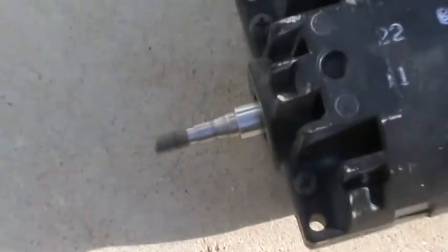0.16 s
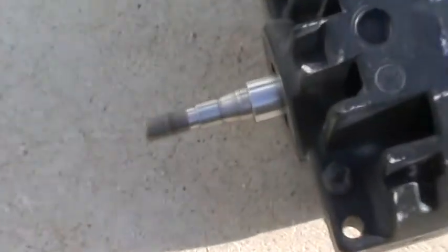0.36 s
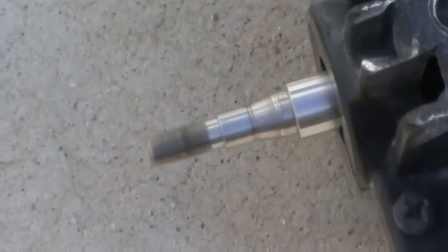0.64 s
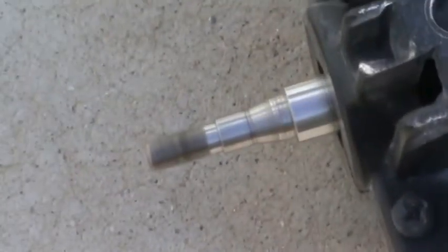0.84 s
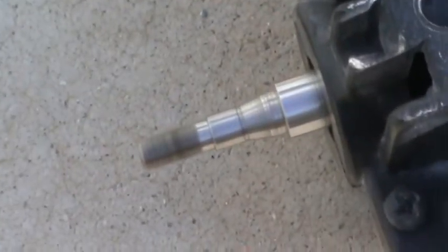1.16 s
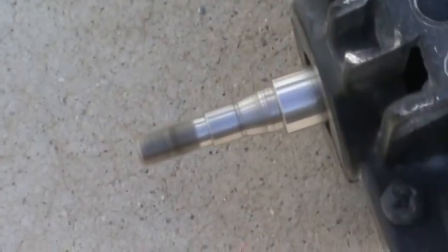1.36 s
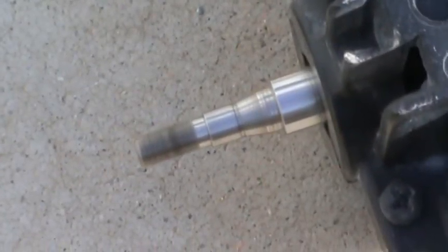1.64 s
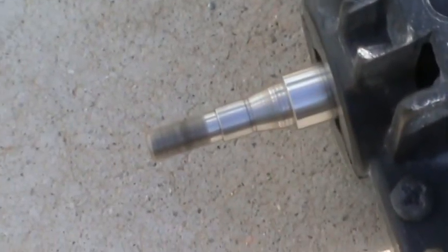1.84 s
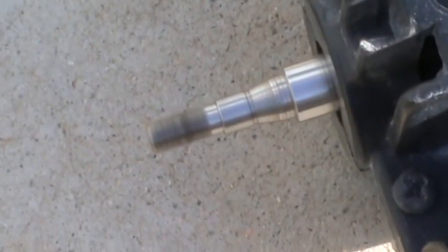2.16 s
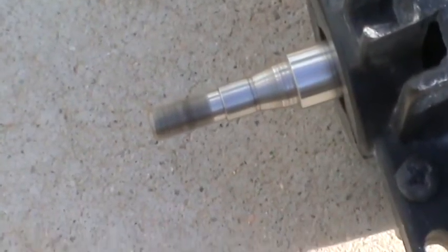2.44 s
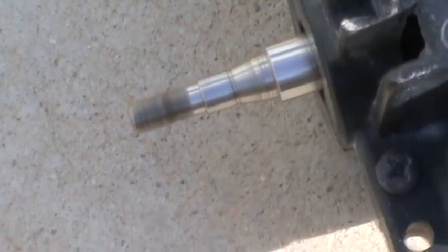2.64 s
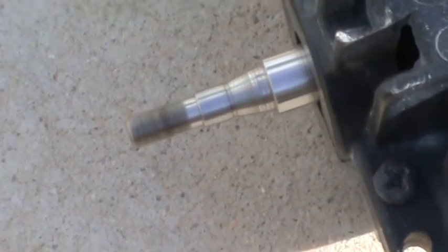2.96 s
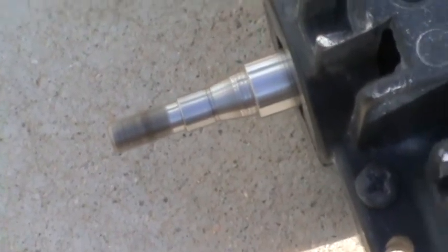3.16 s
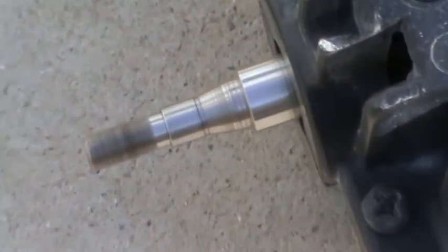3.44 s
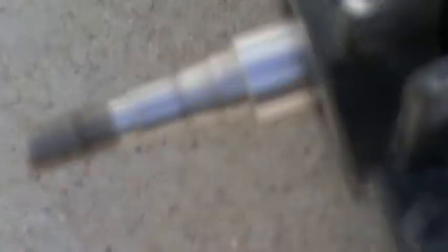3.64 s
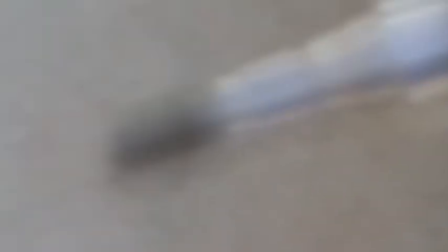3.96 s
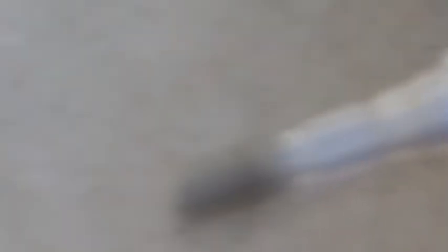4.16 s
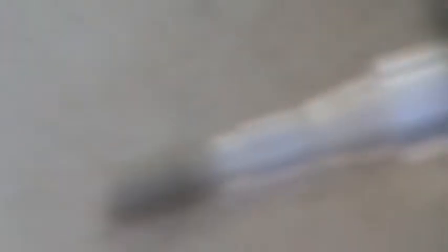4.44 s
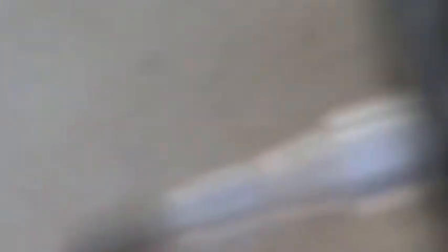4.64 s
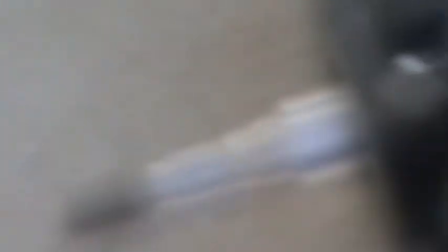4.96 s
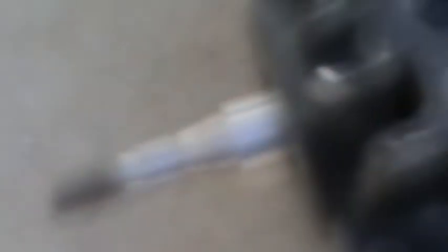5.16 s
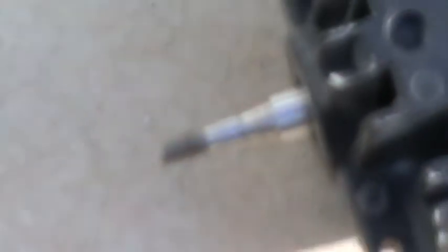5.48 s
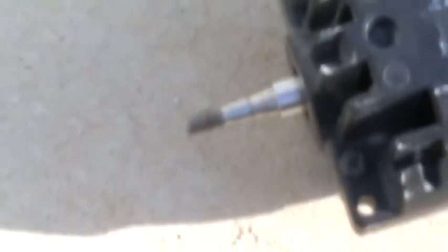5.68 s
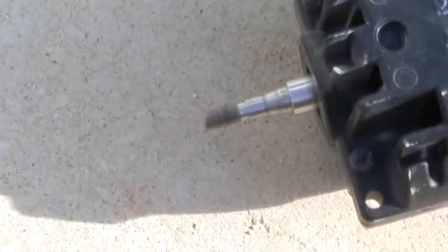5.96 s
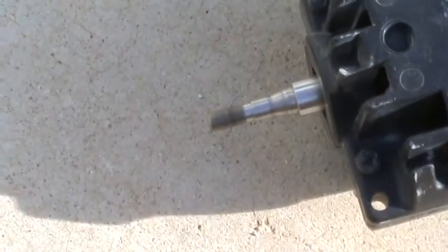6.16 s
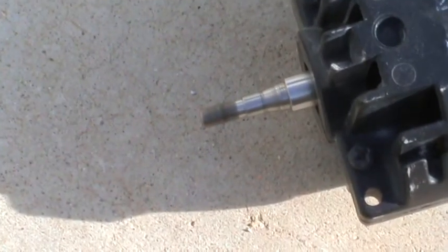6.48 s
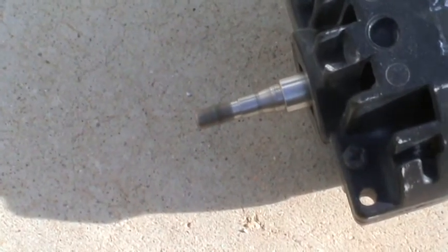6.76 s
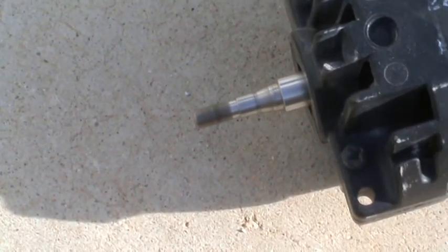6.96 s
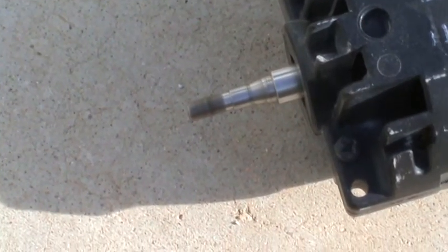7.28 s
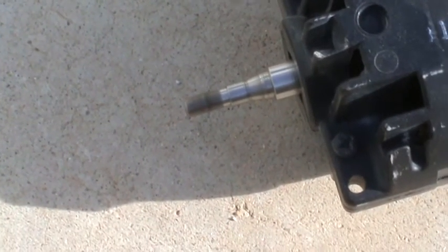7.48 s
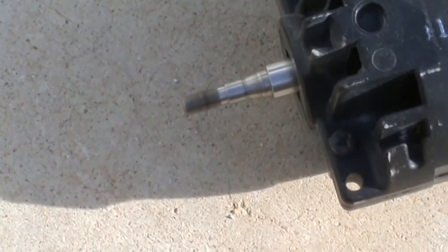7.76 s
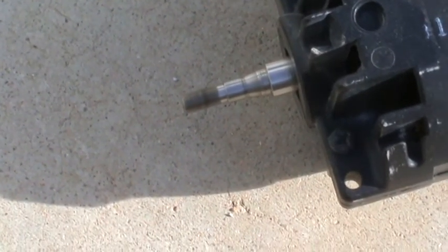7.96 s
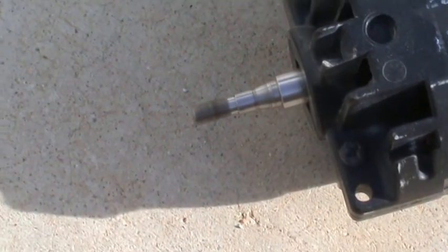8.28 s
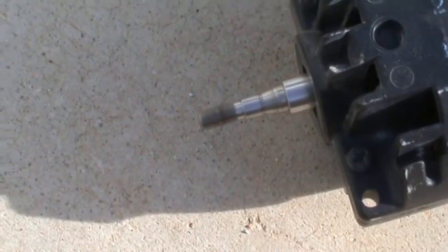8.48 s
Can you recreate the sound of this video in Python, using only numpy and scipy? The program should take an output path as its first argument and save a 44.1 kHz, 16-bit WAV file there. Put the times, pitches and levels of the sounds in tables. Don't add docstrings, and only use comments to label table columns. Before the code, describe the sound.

A bare electric motor roars with rushing fan air and a piercing whine, climbs to a faster speed, wavers, then drops and coasts down.

```python
import sys
import numpy as np
from scipy import signal
from scipy.fft import rfft, irfft, next_fast_len
from scipy.io import wavfile
from scipy.ndimage import uniform_filter1d

SR = 44100
rng = np.random.default_rng(int(sys.argv[2]) if len(sys.argv) > 2 else 0)


def convert_level_to_amplitude(level_db):
    exponent = np.asarray(level_db, float) / 20
    return 10 ** exponent


def put_to_file(sound):
    columns = np.atleast_2d(sound).T
    safe = np.clip(columns, -1, 1)
    whole_steps = np.round(safe * 32767)
    wavfile.write(sys.argv[1], SR, whole_steps.astype(np.int16))


N = 380125
TIME = np.arange(N) / SR
EDGE_HZ = 15740

# (time [s], speed it heads for [Hz], lag [s], share that follows at once [0-1])
SWITCH = [
    (1.038, 651.6, .523, .134),
    (6.563, 548.0, .599, 0),
    (7.536, -40.8, 2.311, 0),
]


def evened(x):
    return x / np.sqrt(np.mean(x ** 2) + 1e-20)


def read(points, hz):
    f, *columns = np.transpose(points)
    return [np.interp(np.log(hz + 1), np.log(f + 1), c) for c in columns]


def curve(rows, t=TIME):
    s, *columns = np.transpose(rows)
    return [np.interp(t, s, c) for c in columns]


def drift(rate_hz, count):
    steps = N // 256 + 2
    hz = np.fft.rfftfreq(steps, 256 / SR)
    spectrum = rfft(rng.standard_normal((count, steps))) / (1 + (hz / rate_hz) ** 2)
    slow = irfft(spectrum, steps)
    return [np.interp(TIME, np.arange(steps) * 256 / SR, evened(row)) for row in slow]


def speed(t):
    start_hz, sag_hz_per_s, quick_lag_s = 538.85, 1.1, .104
    hunt_hz, hunt_period_s, hunt_rising_s, hunt_grows_s = 4.3, 2.094, 2.861, 2.28
    out = start_hz - sag_hz_per_s * t
    for k, (s, goal_hz, lag_s, quick) in enumerate(SWITCH):
        age = np.maximum(t - s, 0)
        was_hz = np.interp(s, t, out)
        left = (1 - quick) * np.exp(-age / lag_s) + quick * np.exp(-age / quick_lag_s)
        swing = np.sin(2 * np.pi * (t - hunt_rising_s) / hunt_period_s)
        hunt = hunt_hz * np.minimum(age / hunt_grows_s, 1) * swing
        out = np.where(t > s, goal_hz + (was_hz - goal_hz) * left + (k == 0) * hunt, out)
    return out


def air(t):
    # (time [s], level at full speed [dB])
    near_db = [(0, -15.5), (.9, -16), (1.3, -18), (2.2, -20), (2.6, -18.5), (3.75, -18), (4.3, -19),
               (6.5, -19), (7.5, -18), (8.62, -17.5)]
    full_hz, air_db_per_octave = 650, 11.0
    bright_full_db, bright_per_octave, dullest_db = .4, 4.7, -2
    coast_fizz_db, coast_fizz_s = 6.5, .3
    octaves = np.log2(speed(t) / full_hz)
    tilt = np.maximum(bright_full_db + bright_per_octave * octaves, dullest_db)
    coasting_s = np.maximum(t - SWITCH[-1][0], 0)
    fizz_db = coast_fizz_db * (1 - np.exp(-coasting_s / coast_fizz_s))
    return curve(near_db, t)[0] + air_db_per_octave * octaves, tilt, fizz_db


def bright_db(hz, tilt, fizz_db):
    return tilt * np.log2(np.maximum(hz / 4500, 1)) + fizz_db * np.clip((hz - 10000) / 2000, 0, 1)


def colour_db(hz):
    # (frequency [Hz], density [dB per Hz])
    broad = [(100, -50), (420, -33), (780, -17.5), (1000, -12.5), (1480, -6.5), (2420, -11), (3320, -5),
             (4870, -11.5), (6500, -9.5), (9600, -16), (10500, -26), (12600, -35), (13600, -33.5),
             (15700, -27.5)]
    # (frequency [Hz], width [Hz], height [dB])
    casing = [(797, 58, 8.5), (1190, 30, -7.5), (1260, 63, 6.5), (1310, 40, -3.5), (1493, 150, 3.5),
              (1680, 120, 2), (1790, 27, -7.5), (2104, 170, 3), (2410, 150, -0.5), (2610, 69, 2.5),
              (2710, 88, -7), (3240, 480, -1.5), (3697, 120, -3), (3980, 660, 1.5), (6160, 890, 2),
              (9260, 1240, 2)]
    both = np.append(np.arange(700, 5000, 43.), hz)
    db = read(broad, both)[0]
    for f, width, height_db in casing:
        db = db + height_db / (1 + (2 * (both - f) / width) ** 2)
    return db[100:] - 10 * np.log10(np.sum(convert_level_to_amplitude(db[:100]) ** 2))


def rush(turns, patchy_db=.3, gust_db=.4):
    # (frequency [Hz], density [dB per Hz])
    yard_colour = [(60, -8.5), (130, -10.5), (250, -0.3), (400, -6.5), (700, -0.5), (3000, -25),
                   (10000, -28), (15700, -28)]
    # (time [s], level [dB])
    yard_level = [(0, -53.5), (.5, -54.5), (2, -57), (4, -58.5), (7, -58.5), (8, -59), (8.62, -62.5)]
    frames, hz = N // 256 + 5, np.fft.rfftfreq(1024, 1 / SR)
    frame_s = np.arange(frames) * 256 / SR
    a, b, c, d, patches = rng.standard_normal((frames, 513, 5)).T
    patches = uniform_filter1d(patches, size=16, axis=0)
    patches = evened(uniform_filter1d(patches, size=8, axis=1))
    gusts = evened(uniform_filter1d(rng.standard_normal(frames), size=3))
    level_db, tilt, fizz_db = air(frame_s)
    level_db = level_db + bright_db(hz[:, None], tilt, fizz_db)
    fan = convert_level_to_amplitude(colour_db(hz)[:, None] + level_db + patchy_db * patches + gust_db * gusts)
    yard = convert_level_to_amplitude(curve(yard_level, frame_s)[0] + read(yard_colour, hz)[0][:, None])
    z = np.array([a + 1j * b, c + 1j * d]) * np.hypot(fan, yard) * np.sqrt(2 / 3)
    chop = 1 + .05 * np.cos(turns)
    return signal.istft(z, nperseg=1024, noverlap=768)[1][:, :N] * chop


def whine(turns, buzz_rad=.24, buzz=.04, flutter_db=.7, sway_db=.7):
    # (time [s], eleventh order [dB], twelfth order [dB])
    beam = [(0, -19.5, -35), (1.2, -18.5, -38), (1.8, -20, -30), (2.08, -18, -39), (2.6, -22, -35),
            (3.2, -22.5, -42), (3.8, -25.5, -45), (4.0, -21, -44), (4.6, -20.5, -39), (5.3, -20.5, -46),
            (6.7, -20.5, -39), (7.1, -17, -39), (7.6, -17.5, -37), (7.72, -25, -33), (7.92, -34, -36),
            (8.11, -41, -40), (8.47, -29, -50), (8.62, -36, -38)]
    # (from [s], to [s])
    half_wave = [
        (0, 1.04),
        (6.56, 7.56),
    ]
    mains_hz = 60
    eleventh_db, twelfth_db = curve(beam)
    powered = sum(1. * (TIME >= a) * (TIME < b) for a, b in half_wave)
    jerky = uniform_filter1d(powered, size=2000)
    mains = 2 * np.pi * mains_hz * TIME
    shaken = turns + buzz_rad / 11 * jerky * np.sin(mains)
    first, second = drift(38, count=2)
    sway, other = drift(3.1, count=2)
    eleventh_db = eleventh_db + sway_db * sway + flutter_db * first
    twelfth_db = twelfth_db + 3 * sway_db * other + 1.2 * second
    eleventh = convert_level_to_amplitude(eleventh_db) * np.cos(11 * shaken) * (1 + buzz * jerky * np.cos(mains))
    twelfth = convert_level_to_amplitude(twelfth_db) * np.cos(12 * shaken)
    return np.sqrt(2) * (eleventh + twelfth)


def orders(turns, speed_hz):
    # (shaft multiple, level over the air noise within 43 Hz [dB])
    shake = [(2, -5), (3, -1), (4, -5), (5, 0), (6, -1), (7, -4), (8, -8), (10, -4)]
    # (time [s], level [dB])
    shaking = [(0, -7), (1.15, -7), (1.6, 4), (2.2, 2), (4, 1), (6.0, -1), (6.5, -4), (7.5, -3), (8, -6),
               (8.62, -4)]
    # (shaft multiple, level over the air noise within 43 Hz at full speed [dB])
    bars = [(9, -8), (13, -2), (14, -2), (15, -4), (16, -1), (17, -7), (18, -6), (19, -2), (20, -4),
            (21, -5), (22, 4), (23, -6), (24, 5), (26, -7), (28, -8), (30, -8), (33, -7), (36, -8)]
    # (time [s], level [dB])
    shaft = [(0, -52), (1.0, -52), (2.0, -53), (6.5, -55), (7.2, -59), (7.5, -59), (8.2, -64), (8.4, -72),
             (8.62, -75)]
    # (time [s], level [dB])
    whirl = [(6.8, -80), (6.95, -61), (7.3, -60), (7.5, -75), (7.68, -61), (8.03, -56), (8.12, -85)]
    level_db, tilt, fizz_db = air(TIME)
    grid_hz = np.arange(0, 24000, 25.)
    casing_db = colour_db(grid_hz) - 60 * (grid_hz > EDGE_HZ)
    slow_db = .018 * np.clip(545 - speed_hz, 0, 200)
    shaking_db = curve(shaking)[0]
    lines = [(k, db + shaking_db) for k, db in shake]
    lines += [(k, db + slow_db) for k, db in bars]
    wobble, *wanders = drift(3.6, count=len(lines) + 1)
    out = convert_level_to_amplitude(curve(whirl)[0]) * np.cos(turns / 2)
    out += convert_level_to_amplitude(curve(shaft)[0] + 2.5 * wobble) * np.cos(turns + wobble)
    for (k, db), wander in zip(lines, wanders):
        heard_db = np.interp(k * speed_hz, grid_hz, casing_db) + bright_db(k * speed_hz, tilt, fizz_db)
        out += convert_level_to_amplitude(level_db + heard_db + db + 1.5 * wander) * np.cos(k * turns + wander)
    return np.sqrt(2) * out


def wind(lumps_db=-4.0):
    # (time [s], rise [dB], half length [s])
    gusts = [
        (.29, 7, .25),
        (3.6, 3, .3),
        (5.4, 11, .18),
        (7.2, 4, .3),
        (8.04, 9, .2),
        (8.62, 7, .4),
    ]
    # (time [s], pitch [Hz], level [dB])
    drones = [
        [(0, 66.1, -63), (.5, 62.9, -61), (1.0, 58.2, -61), (2.0, 55, -64), (3.0, 52, -67), (4.5, 50.3, -71),
         (5.5, 50, -90)],
        [(7.8, 113, -90), (7.95, 113, -66), (8.3, 116, -69), (8.62, 115, -67)],
    ]
    # (time [s], peak [dB], pitch [Hz])
    taps = [
        (3.68, -48, 55),
        (3.84, -57, 60),
    ]
    wind_db, wind_db_per_s = -62.0, -1.5
    band = signal.butter(2, [40, 95], "bandpass", fs=SR, output="sos")
    low = signal.sosfilt(band, rng.standard_normal(N))
    gust_db = sum(db * np.maximum(1 - abs(TIME - s) / half, 0) for s, db, half in gusts)
    out = convert_level_to_amplitude(wind_db + wind_db_per_s * TIME + gust_db + lumps_db) * evened(low)
    for rows, wander in zip(drones, drift(4, count=2)):
        hz, db = curve(rows)
        out += np.sqrt(2) * convert_level_to_amplitude(db + 1.5 * wander) * np.sin(2 * np.pi * np.cumsum(hz) / SR)
    for s, db, hz in taps:
        age = np.maximum(TIME - s, 0)
        out += convert_level_to_amplitude(db) * 2.5 * np.sin(2 * np.pi * hz * age) * np.exp(-age / .018)
    return out


def scene():
    # (frequency [Hz], level [dB])
    ports = [(40, -21), (250, -3), (700, 0.1), (1400, -0.4), (2400, -4.5), (3200, -6), (5200, -10),
             (7000, -10), (8400, -13.5), (9400, -14), (10200, -5.5), (12500, 12), (14300, -5), (14700, -23)]
    # (frequency [Hz], likeness [0-1], phase [rad])
    likeness = [(60, .2, -1.6), (250, .96, -1.6), (900, .99, -1.65), (1400, .98, -1.85), (2000, .92, -2.05),
                (3200, .94, -2.1), (5200, .72, -2.15), (7000, .75, -2.0), (9500, .45, -1.9),
                (11000, .15, -1.6)]
    speed_hz = speed(TIME)
    turns = 2 * np.pi * np.cumsum(speed_hz) / SR
    near, far = rush(turns)
    tones = whine(turns) + orders(turns, speed_hz)
    size = next_fast_len(N)
    hz = np.fft.rfftfreq(size, 1 / SR)
    side_db = read(ports, hz)[0]
    same, phase = read(likeness, hz)
    alike = (same * rfft(near, size) + rfft(tones, size)) * np.exp(1j * phase)
    unlike = np.sqrt(1 - same ** 2) * rfft(far, size)
    side = irfft(convert_level_to_amplitude(side_db) * (alike + unlike), size)[:N]
    breeze = wind()
    mid = near + tones + breeze
    side = side + convert_level_to_amplitude(-17.0) * np.roll(breeze, shift=200)
    return np.array([mid + side, mid - side])


def low_pass(x):
    return signal.sosfilt(signal.butter(12, 16920, fs=SR, output="sos"), x)


def record(dry):
    edge = signal.firwin(1023, EDGE_HZ, window=("kaiser", 10), fs=SR)
    mix = signal.oaconvolve(dry, edge[None], "same")
    return low_pass(mix)


dry = scene()
out = record(dry)
put_to_file(out)
```